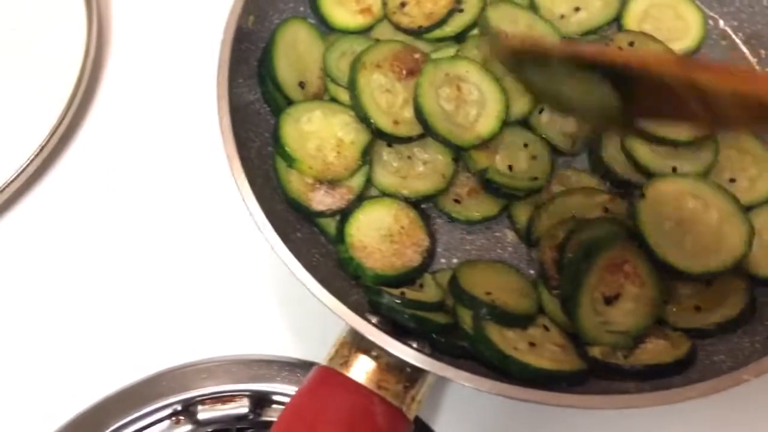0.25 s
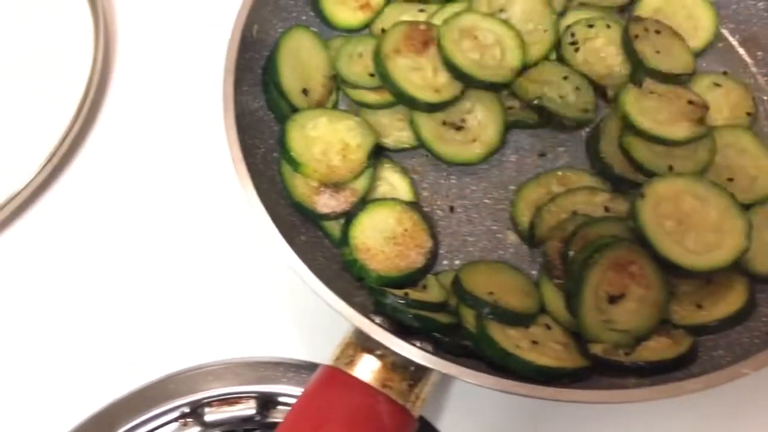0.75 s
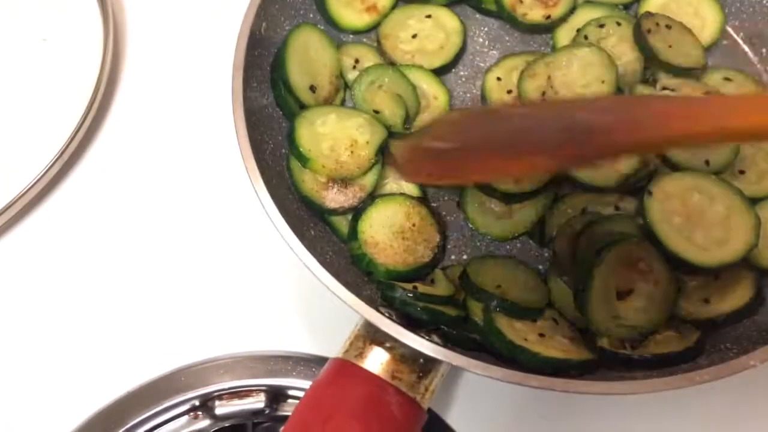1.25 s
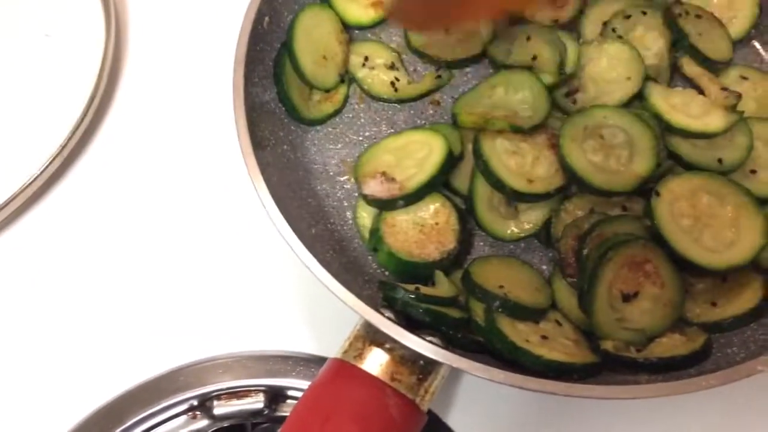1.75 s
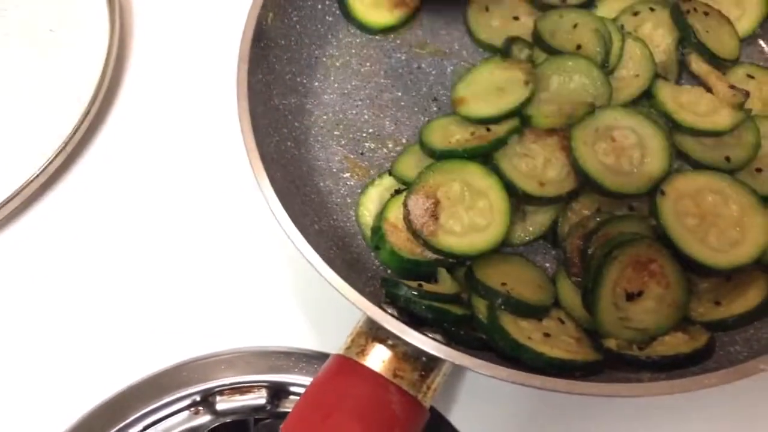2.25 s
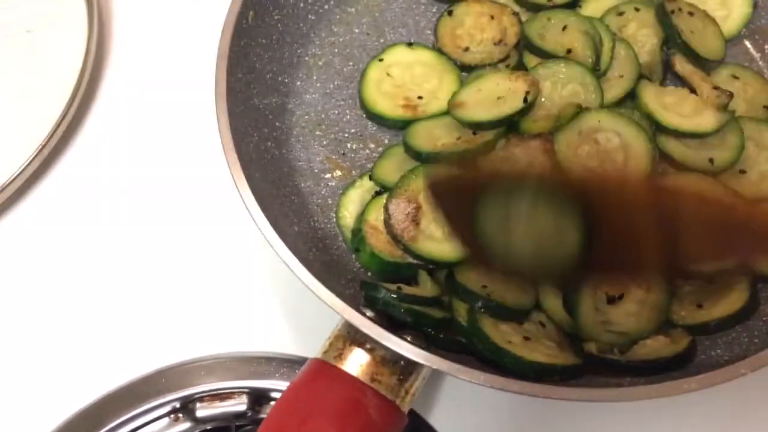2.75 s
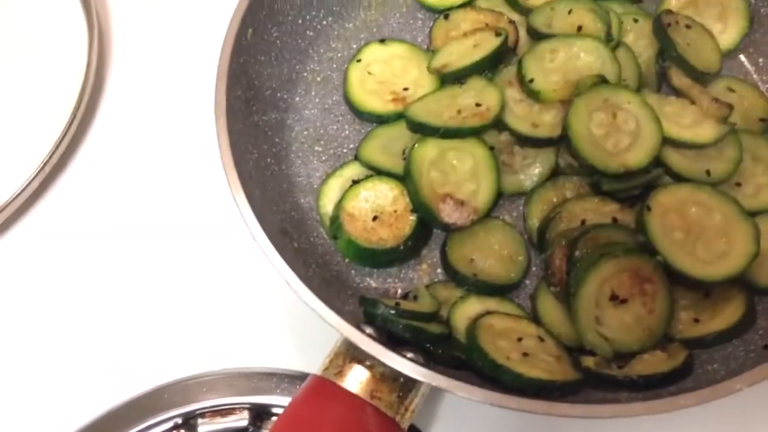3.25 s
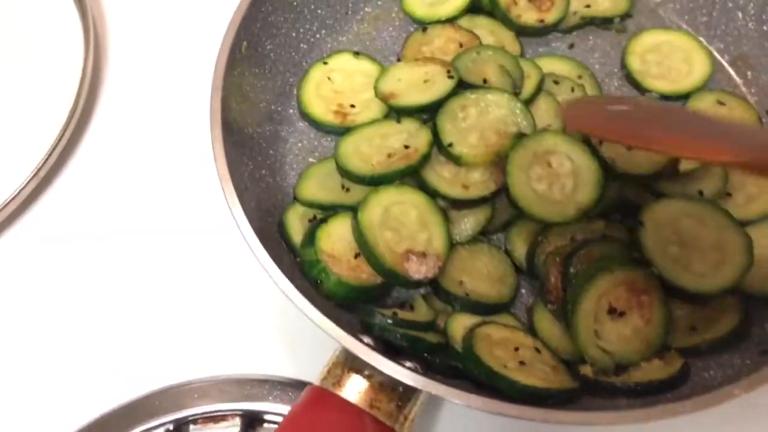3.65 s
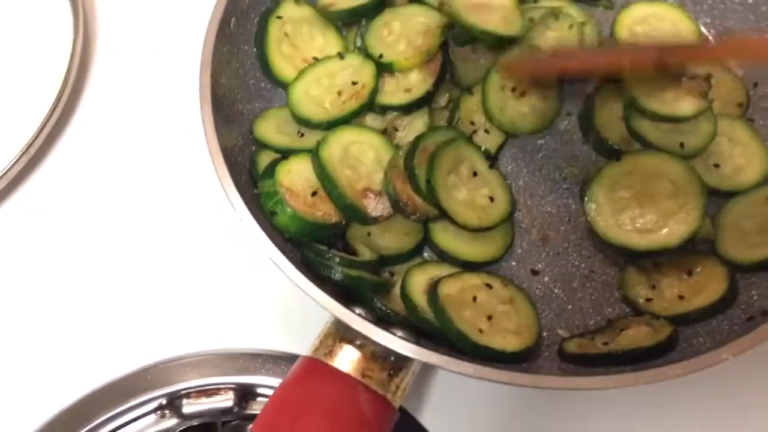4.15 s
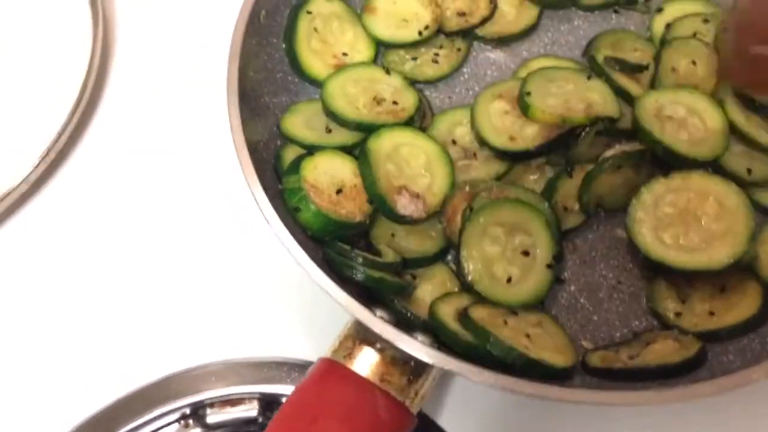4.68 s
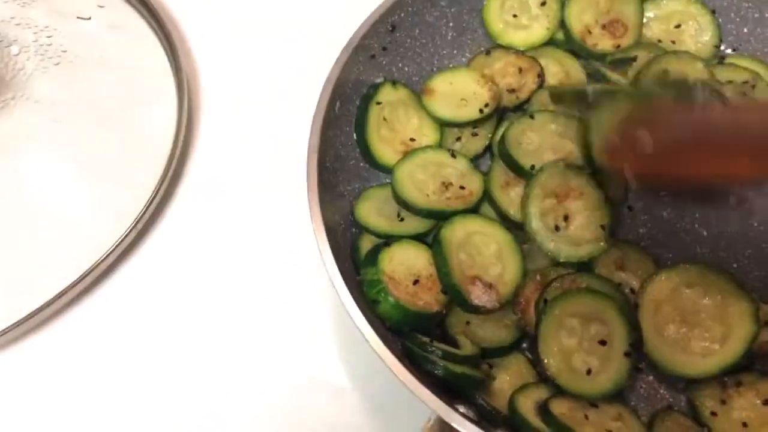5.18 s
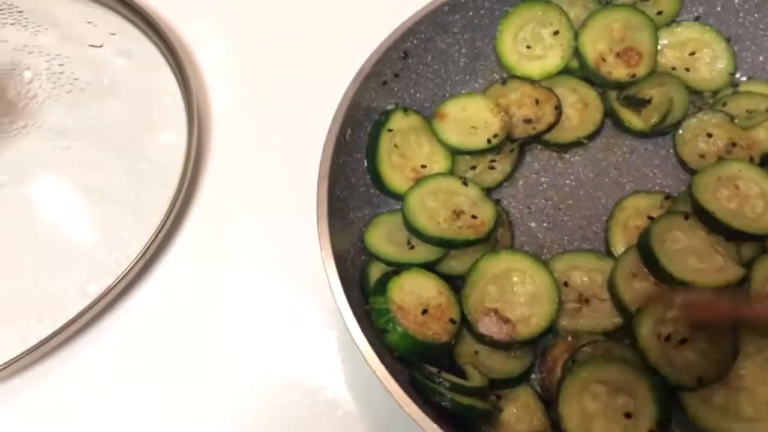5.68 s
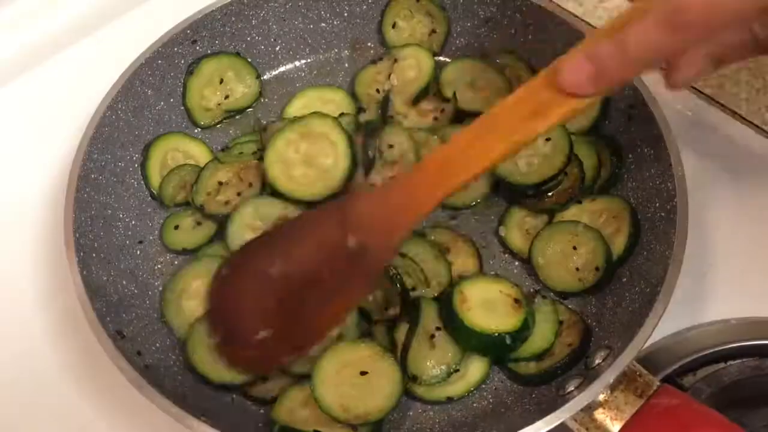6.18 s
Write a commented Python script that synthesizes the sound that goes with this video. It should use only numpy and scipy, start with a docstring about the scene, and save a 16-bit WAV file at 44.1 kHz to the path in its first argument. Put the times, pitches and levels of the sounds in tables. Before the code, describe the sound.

Courgette slices sizzle steadily in a nonstick pan throughout, close and mono, with short kitchen reflections. In the first half second a wooden spatula clacks rapidly and scrapes, and the pan knocks dully on its burner. From about 1 to 3 seconds come lighter taps and short scraping strokes, with a soft rumble and faint flops of moving slices; the sizzle swells briefly as they turn. A thin steam hiss runs from 3 to about 3.6 seconds. A sharp clack at 3.7 seconds starts a flurry of knocks and scrapes, rocking the pan, and the sizzle surges around 4 seconds. Another hard clack at 4.7 seconds leads into more stirring, with lighter taps until 6 seconds. Oil ticks near 0.5, 5.1 and 5.2 seconds. The sound drops out for an instant just after 6.1 seconds, then returns with a sizzling swell and a last spit.

```python
"""A wooden spatula clacks and scrapes in a nonstick pan, turning sizzling courgette slices.
Each blow rings the pan's modes and the blade's own note; heavy pushes rock the pan on its burner.
The slices rumble and flop. Bursting bubbles make the sizzle, which swells as wet faces meet the heat;
oil spits and steam hisses from under a slice. Close, mono, with a brief dropout near the end."""
import sys
import numpy as np
from scipy import signal
from scipy.fft import rfft, irfft, next_fast_len
from scipy.io import wavfile
from scipy.ndimage import map_coordinates

SR = 44100
rng = np.random.default_rng(int(sys.argv[2]) if len(sys.argv) > 2 else 0)


def generate_wav(sig):
    """Save sig (samples, or channels by samples) to the path in sys.argv[1] as 16-bit PCM at SR."""
    pcm = np.round(np.clip(np.atleast_2d(sig).T, -1, 1) * 32767).astype(np.int16)
    wavfile.write(sys.argv[1], SR, pcm)


N = 283122

# blade landings: start_s, level_db, weight_db, hardness_db, blade_hz
CLACKS = [(0.047, -30.5, -6.5, -8, 1390), (0.086, -30, 1, -10, 860), (0.142, -30.5, -10, -8, 1386),
          (0.1505, -28, -6, 2, 840), (0.2411, -23, -6.5, -5, 1450), (0.352, -31.5, -8, -5.5, 838),
          (0.382, -34, -9, -8.5, 825), (0.445, -37.5, -14, -4, 934), (0.5375, -21, -22, -22.5, 815),
          (0.975, -34.5, -10, -4.5, 865), (1.083, -35, -8.5, -10, 890), (1.522, -40, -6, -6, 1645),
          (1.657, -41, -22, -14, 866), (2.6049, -32, -5, -8.5, 910), (2.7099, -35.5, -5.5, -7, 940),
          (3.6574, -20, -10, -2.5, 1470), (3.793, -30.5, -7, -8.5, 950), (3.818, -32, -7, -10, 1510),
          (3.843, -34.5, -10, -6, 795), (3.895, -41, -1, -9, 860), (3.956, -36.5, -2, -13, 870),
          (3.971, -33.5, -2, -5.5, 1495), (3.988, -30.5, -18, -24, 1520), (4.125, -41, -21, -3, 800),
          (4.672, -19, -10, -6, 1522), (4.8132, -28, -4, -13, 816), (4.866, -34, -10, -18, 1415),
          (4.873, -27.5, -7, -5.5, 660), (4.936, -35, -8.5, -17, 1550), (4.983, -39, -11, 1.5, 700),
          (4.992, -33.5, -6.5, -2, 712), (5.11, -34.5, -1.5, -11, 810), (5.114, -28.5, -9, -1, 828),
          (5.219, -42, -10, -7, 1426), (5.645, -31, -10, -8.5, 847), (5.699, -43, -5, -10, 835),
          (5.748, -30, -11.5, -17, 834), (5.8, -40.5, -5.5, -11, 846), (6.03, -43, -9, -2, 840)]
# strokes through the slices: start_s, length_s, rumble_db, scrape_db
STROKES = [(-.03, .52, -41, -31.5), (0.938, 0.18, -49, -41), (1.49, 0.14, -48.5, -49),
           (1.986, .1, -45, -39.5), (2.413, .3, -47, -40), (2.797, .24, -53, -39), (3.66, 0.27, -41, -36.5),
           (3.96, 0.24, -51.5, -35), (4.542, 0.65, -45, -39), (5.25, .16, -51, -39),
           (5.544, 0.34, -56, -43), (5.994, 0.11, -50.5, -33.5), (6.245, .15, -47.5, -42.5)]


def amp(db):
    """Decibels to gain."""
    return 10 ** (np.asarray(db) / 20)


def unit(x):
    """Scale to rms 1."""
    return x / np.sqrt(np.mean(x ** 2) + 1e-20)


def along(points, hz):
    """Interpolate (hz, value) points on a log frequency axis."""
    point_hz, values = np.transpose(points)
    return np.interp(np.log(hz + 1), np.log(point_hz), values)


def wobble(rate_hz):
    """Smooth random curve, rate_hz knots a second."""
    knots = rng.standard_normal(int(N * rate_hz / SR) + 4)
    return map_coordinates(knots, [np.arange(N) * rate_hz / SR])


def filtered(x, response):
    """Apply response(hz) by FFT."""
    size = next_fast_len(len(x) + SR // 4)
    return irfft(rfft(x, size) * response(np.fft.rfftfreq(size, 1 / SR)), size)[:len(x)]


def add(track, start_s, sound):
    """Mix a sound into the track in place."""
    span = track[max(round(start_s * SR), 0):][:len(sound)]
    span += sound[:len(span)]


def fade(t, t60_s):
    """Free decay, 60 dB down at t60_s."""
    return np.exp(-np.log(1000) * t / t60_s)


def bell(x, centre, sigma):
    """Gaussian with peak 1."""
    return np.exp(-.5 * ((x - centre) / sigma) ** 2)


def held(start_s, length_s, attack_s, release_t60_s):
    """Envelope: rise, hold, decay."""
    t = np.maximum(np.arange(N) / SR - start_s, 0)
    return (1 - np.exp(-t / attack_s)) * fade(np.maximum(t - length_s, 0), release_t60_s)


def kitchen(x, wet_db, build_s):
    """Add short diffuse reflections from hob, walls and cupboards."""
    # room decay: freq_hz, t60_s
    decay = [(120, 0.38), (400, 0.31), (900, 0.36), (2500, 0.23), (6000, 0.092), (12000, 0.33)]
    hz, t, noise = signal.stft(rng.standard_normal(len(x)), SR, nperseg=256)
    shaped = noise * fade(t, along(decay, hz)[:, None]) * (1 - np.exp(-t / build_s))
    tail = signal.istft(shaped, SR, nperseg=256)[1]
    return x + amp(wet_db) * signal.fftconvolve(x, tail / np.linalg.norm(tail))[:len(x)]


def bubbles(rate_hz=4000, scatter_db=5.5, blur_gain=2.3):
    """Tiny random bursts; a few stand out of a blur of fainter ones."""
    bursting = rng.random(N) < rate_hz / SR
    size = amp(scatter_db * np.minimum(rng.standard_normal(N), 2.8))
    pops = unit(bursting * size * rng.choice([-1, 1], N))
    return unit(pops + blur_gain * rng.standard_normal(N))


def frying_colour(hz):
    """Gain of the burst spectrum, lifted at the pan's resonances."""
    # burst spectrum: freq_hz, density_db
    spectrum = [(150, -28), (300, -10), (550, -13.5), (800, -9), (1100, -7), (1400, -2), (2000, -0.5),
                (2600, -3.5), (3500, -1.5), (5400, -2), (6700, -2.5), (7900, -4.5), (10500, -2.5),
                (15400, -3.5)]
    # bowl resonances: centre_hz, width_hz, lift_db
    bowl = [(847, 67, 8), (1435, 145, 6.5), (1940, 120, 0), (3420, 150, 3.5), (6350, 1200, 1.5),
            (9900, 1700, 1.5)]
    lift_db = sum(db / (1 + (2 * (hz - centre_hz) / width_hz) ** 2) for centre_hz, width_hz, db in bowl)
    return amp(along(spectrum, hz) + lift_db)


def sizzle(treble_gain_db, split_hz, flutter_db):
    """Water boils off in the oil: one sizzle, separate levels for treble above split_hz and mids below."""
    # sizzle levels: time_s, treble_db, mids_db
    levels = [(0.0, -41, -39), (0.3, -42, -39), (0.7, -43.5, -43), (2.74, -42.5, -44), (3.45, -40.5, -43),
              (3.94, -44.5, -42), (4.15, -42, -46), (4.48, -41.5, -43), (4.86, -44, -40),
              (5.23, -43.5, -46), (6.1, -41.5, -42.5)]
    time_s, *columns = np.transpose(levels)
    treble_db, mids_db = [np.interp(np.arange(N) / SR, time_s, column) for column in columns]
    boil = bubbles() * amp(flutter_db * wobble(rate_hz=30))
    high_share = lambda hz: hz ** 4 / (hz ** 4 + split_hz ** 4)
    treble = unit(filtered(boil, lambda hz: frying_colour(hz) * high_share(hz)))
    mids = unit(filtered(boil, lambda hz: frying_colour(hz) * (1 - high_share(hz))))
    return treble * amp(treble_db + treble_gain_db) + mids * amp(mids_db)


def sears(gain_db, bubble_hz, spread_oct):
    """A wet face meets the heat: a short swell of bubbles around one size."""
    # turned slices searing: peak_s, level_db, sigma_s
    swells = [(.58, -40.5, 0.043), (1.078, -41.5, 0.065), (1.615, -39.5, 0.097), (2.106, -41, 0.13),
              (4.06, -36, 0.07), (5.61, -40, 0.025), (6.347, -33.5, 0.05)]
    t = np.arange(N) / SR
    envelope = sum(amp(db) * bell(t, peak_s, sigma_s) for peak_s, db, sigma_s in swells)
    band = lambda hz: bell(np.log2(hz + 1), np.log2(bubble_hz), spread_oct)
    hiss = filtered(bubbles(), lambda hz: frying_colour(hz) * band(hz))
    return amp(gain_db) * envelope * unit(hiss)


def spits(gain_db, t60_s):
    """Single oil drops burst with a sharp tick."""
    # oil drops: start_s, peak_db
    drops = [(.466, -18), (5.0868, -17), (5.2001, -16.5), (5.901, -25), (6.3822, -13)]
    t = np.arange(SR // 50) / SR
    out = np.zeros(N)
    for start_s, db in drops:
        burst = rng.standard_normal(len(t)) * fade(t, t60_s)
        tick = filtered(np.roll(burst, 16), frying_colour)  # room for the filter's pre-ring
        add(out, start_s, amp(db + gain_db) * tick / np.abs(tick).max())
    return out


def steam(start_s, length_s, level_db, sag_db_per_s, centre_hz, width_hz, air_db, air_hz):
    """A thin jet from under a slice: narrow hiss with an airy top, weakening as pressure runs down."""
    jet = lambda hz: 1 / (1 + (2 * (hz - centre_hz) / width_hz) ** 2)
    air = lambda hz: amp(air_db) * hz ** 2 / (hz ** 2 + air_hz ** 2)
    hiss = unit(filtered(rng.standard_normal(N), lambda hz: jet(hz) + air(hz)))
    pressure = amp(level_db - sag_db_per_s * (np.arange(N) / SR - start_s))
    return hiss * pressure * held(start_s, length_s, attack_s=0.015, release_t60_s=0.23)


def stroke_gains():
    """Rumble and scrape envelopes: each stroke starts quickly and settles slowly."""
    return sum(amp(levels_db)[:, None] * held(start_s, length_s, attack_s=0.025, release_t60_s=0.45)
               for start_s, length_s, *levels_db in STROKES)


def rumble(drag_db, lumpy_db, resting_db):
    """Soft slices drag over the pan floor; a faint rumble stays between strokes."""
    # rubbing spectrum: freq_hz, density_db
    spectrum = [(20, -22), (40, -14), (58, 2.5), (95, -3), (130, 6), (155, -4), (180, -0.5), (230, -8.5),
                (330, -9), (460, -13), (600, -13), (900, -8), (2000, -44), (5000, -70)]
    rub = filtered(rng.standard_normal(N), lambda hz: amp(along(spectrum, hz)))
    lumps = amp(lumpy_db * wobble(rate_hz=25))
    drag, _ = stroke_gains()
    return unit(rub * lumps) * np.hypot(amp(drag_db) * drag, amp(resting_db))


def flops(gain_db, t60_s, q, attack_s):
    """A slice lands flat; the air cushion under it gives a dull pitch."""
    # slice landings: start_s, level_db, pitch_hz
    landings = [(1.963, -45, 140), (2.03, -41.5, 480), (2.435, -38.5, 420), (2.473, -39, 147),
                (2.503, -45, 475), (3.474, -38.5, 430), (6.244, -35.5, 70.6), (6.274, -37, 72)]
    t = np.arange(SR // 4) / SR
    out = np.zeros(N)
    for start_s, db, pitch_hz in landings:
        slap = rng.standard_normal(len(t)) * fade(t, t60_s) * (1 - np.exp(-t / attack_s))
        cushion = lambda hz: 1j * hz / (pitch_hz ** 2 - hz ** 2 + 1j * hz * pitch_hz / q)
        plop = filtered(slap, lambda hz: cushion(hz) / (1 + 1j * hz / (2 * pitch_hz)))
        add(out, start_s, amp(db + gain_db) * unit(plop))
    return out


def pan_ring(crack_db, crack_t60_s, scatter_db, detune):
    """One strike: a rough crack plus pan modes, detuned by shifting food and pressing wood."""
    # modes of the pan on its burner: freq_hz, level_db, t60_s
    modes = [(131.5, -18.5, 0.13), (182, -24, 0.21), (282, -24, 0.11), (327, -20.5, 0.079),
             (457, -15.5, 0.089), (635, -23, 0.087), (834, -18, 0.077), (895, -16, 0.037),
             (1254, -31, 0.094), (1451, -18.5, 0.074), (1530, -13, 0.027), (1917, -18.5, 0.038),
             (2310, -29, 0.13), (2696, -23.5, 0.038), (2762, -44, 0.045), (3077, -22, 0.028),
             (3325, -19.5, 0.023)]
    # wood meeting metal: freq_hz, density_db
    crack_spectrum = [(40, 11), (80, -1), (300, -2), (600, -6), (850, 2.5), (1130, -7.5), (1550, 3.5),
                      (2400, -8.5), (3400, -6), (4500, -12), (6500, -12.5), (9000, -21.5), (15000, -23.5)]
    t = np.arange(SR // 4) / SR
    mode_hz, db, t60_s = np.transpose(modes)[:, :, None]
    strength = amp(db + scatter_db * rng.standard_normal(db.shape)) * rng.choice([-1, 1], db.shape)
    loaded_hz = mode_hz * (1 + detune * rng.standard_normal(db.shape))
    ring = np.sum(strength * np.sin(2 * np.pi * loaded_hz * t) * fade(t, t60_s), axis=0)
    crack = unit(filtered(rng.standard_normal(len(t)), lambda hz: amp(along(crack_spectrum, hz))))
    return ring + amp(crack_db) * crack * fade(t, crack_t60_s)


def rock_backs(hollow_hz, width_hz, hollow_db, low_hz, high_hz):
    """The tipped pan drops back on its burner: a dull knock with the bowl's hollow note."""
    # pan landings: start_s, level_db
    landings = [(.165, -26.5), (.283, -29), (3.707, -25.5), (3.83, -31.5), (4.713, -27.5)]
    hollow = lambda hz: 1j * hz * width_hz / (hollow_hz ** 2 - hz ** 2 + 1j * hz * width_hz)
    band = lambda hz: 1j * hz / (low_hz + 1j * hz) / (1 + 1j * hz / high_hz)
    out = np.zeros(N)
    for start_s, db in landings:
        ring = pan_ring(crack_db=-4, crack_t60_s=0.038, scatter_db=0.5, detune=0.0038)
        ring = kitchen(ring, wet_db=-11.5, build_s=0.004)
        thud = filtered(ring, lambda hz: (1 + amp(hollow_db) * hollow(hz)) * band(hz))
        add(out, start_s, amp(db) * thud / np.std(thud[:SR // 33]))  # level over the first 30 ms
    return out


def scrapes(gain_db, glide_db, slip_rate_hz, low_hz, high_hz):
    """Wet wood sticks and slips, each slip a tiny blow; the blade skids on landing, then glides."""
    slips = (rng.random(N) < slip_rate_hz / SR) * rng.standard_normal(N)
    ring = pan_ring(crack_db=3, crack_t60_s=0.011, scatter_db=4.5, detune=0.0014)
    band = lambda hz: hz ** 2 / (hz ** 2 + low_hz ** 2) / np.sqrt(1 + (hz / high_hz) ** 2)
    rasp = filtered(signal.fftconvolve(slips, ring)[:N], band)
    skid = bell(np.arange(SR // 8) / SR, centre=0.016, sigma=0.01)
    skids = np.zeros(N)
    for start_s, *_ in CLACKS:
        add(skids, start_s, skid)
    _, effort = stroke_gains()
    return amp(gain_db) * effort * (amp(glide_db) + np.minimum(skids, 1)) * unit(rasp)


def blow(blade_hz, blade_db, t60_s, overtone_db, attack_s):
    """The pan rings into the room; the hand-damped blade adds a short dry tock."""
    pan = pan_ring(crack_db=-6.5, crack_t60_s=0.034, scatter_db=1, detune=0.017)
    pan = kitchen(pan, wet_db=-10, build_s=0.0025)
    t = np.arange(len(pan)) / SR
    phase = 2 * np.pi * blade_hz * t
    note = np.sin(phase) * fade(t, t60_s)
    overtone = amp(overtone_db) * np.sin(5.5 * phase) * fade(t, 0.23 * t60_s)
    return (pan + amp(blade_db) * (note + overtone)) * (1 - np.exp(-t / attack_s))


def contact(x, snap_db, soft_db, soft_hz, db_per_oct):
    """Low-pass: a harder blow has a shorter contact and reaches higher."""
    cutoff_hz = np.clip(soft_hz * 2 ** ((snap_db - soft_db) / db_per_oct), 2500, 16000)
    return signal.sosfilt(signal.butter(2, cutoff_hz, fs=SR, output="sos"), x)


def knock(level_db, weight_db, hardness_db, blade_hz):
    """One blade landing; weight and hardness balance four bands."""
    blade_db = -12.5 - 0.41 * hardness_db  # soft contact brings out the blade's note
    hit = blow(blade_hz, blade_db, t60_s=0.055, overtone_db=-17, attack_s=0.00073)
    hit = contact(hit, level_db + hardness_db, soft_db=-43, soft_hz=3800, db_per_oct=3.5)
    rock_db = weight_db - 4 + 0.44 * hardness_db  # a cushioned blow hardly rocks the pan
    bands_hz = [(50, 220), (220, 600), (600, 2200), (2200, 16000)]  # rocking, thud, clack, snap
    out = np.zeros(len(hit))
    for band_hz, share_db in zip(bands_hz, (rock_db, weight_db, 0, hardness_db)):
        part = signal.sosfilt(signal.butter(3, band_hz, "bandpass", fs=SR, output="sos"), hit)
        out += amp(level_db + share_db) * part / np.std(part[:SR // 33])
    return out


def grazes(gain_db, scatter_db):
    """One light touch at a random time in each stroke, louder where the blade scrapes harder."""
    out = np.zeros(N)
    for start_s, length_s, _, scrape_db in STROKES:
        db = scrape_db + gain_db + scatter_db * rng.standard_normal()
        touch_s = start_s + length_s * rng.random()
        add(out, touch_s, knock(db, weight_db=-10.5, hardness_db=-9.5, blade_hz=844))
    return out


def spatula(gain_db, rebound_above_db, flight_s):
    """The blade clacks on the pan; strong blows rebound into a softer second touch."""
    out = np.zeros(N)
    for start_s, db, weight_db, hardness_db, blade_hz in CLACKS:
        add(out, start_s, knock(db, weight_db, hardness_db, blade_hz))
        if db > rebound_above_db:
            add(out, start_s + flight_s, knock(db - 8.5, weight_db, hardness_db - 6, blade_hz=1418))
    return amp(gain_db) * out


def scene():
    """Frying and stirring, the same on both channels."""
    mix = sizzle(treble_gain_db=1, split_hz=6120, flutter_db=0.96)
    mix += sears(gain_db=-0.5, bubble_hz=4460, spread_oct=1.3)
    mix += spits(gain_db=1, t60_s=0.0015)
    mix += steam(start_s=3.03, length_s=0.56, level_db=-41.5, sag_db_per_s=13,
                 centre_hz=6770, width_hz=1300, air_db=-20, air_hz=11000)
    mix += scrapes(gain_db=-5.5, glide_db=-14.5, slip_rate_hz=500, low_hz=724, high_hz=2980)
    mix += rumble(drag_db=0.5, lumpy_db=2, resting_db=-57)
    mix += flops(gain_db=-14, t60_s=0.1, q=2.1, attack_s=0.0023)
    mix += spatula(gain_db=0.1, rebound_above_db=-29.5, flight_s=0.012)
    mix += grazes(gain_db=-6, scatter_db=3)
    mix += rock_backs(hollow_hz=456, width_hz=47, hollow_db=10, low_hz=110, high_hz=3500)
    return np.array([mix] * 2)


def record(dry):
    """Brief dropout, then a steep low-pass."""
    gap_start_s, gap_end_s, cutoff_hz = 6.130, 6.1765, 15450
    t = np.arange(N) / SR
    live = (t < gap_start_s) | (t > gap_end_s)
    low_pass = lambda hz: 1 / np.sqrt(1 + (hz / cutoff_hz) ** 400)
    return np.array([filtered(channel * live, low_pass) for channel in dry])


dry = scene()
out = record(dry)
generate_wav(out)
```